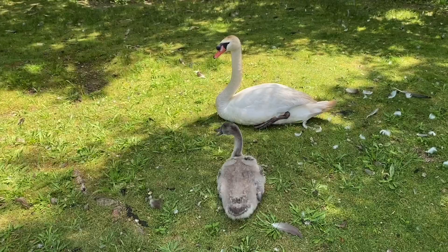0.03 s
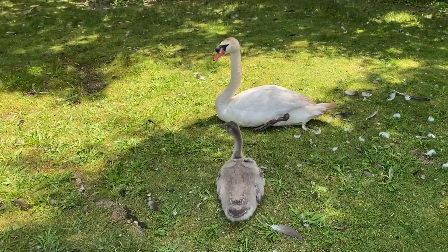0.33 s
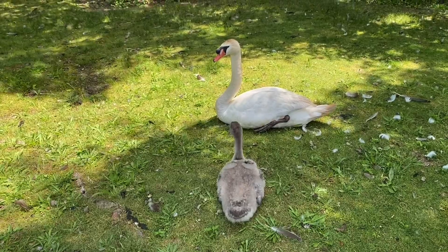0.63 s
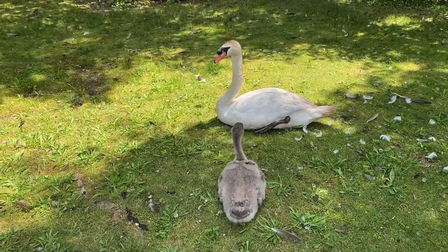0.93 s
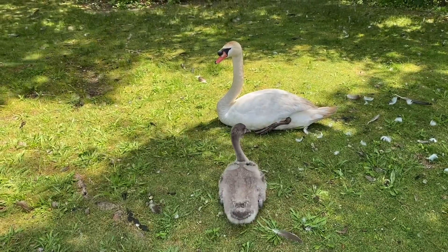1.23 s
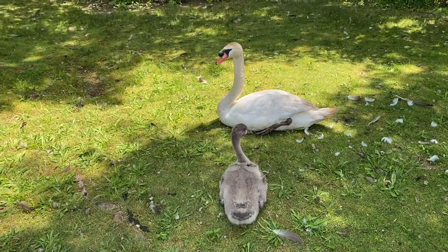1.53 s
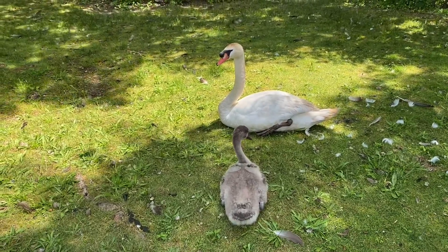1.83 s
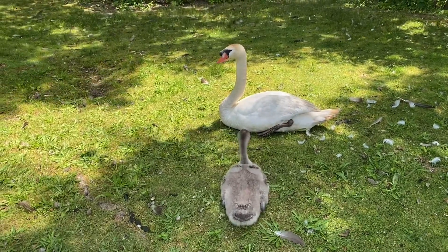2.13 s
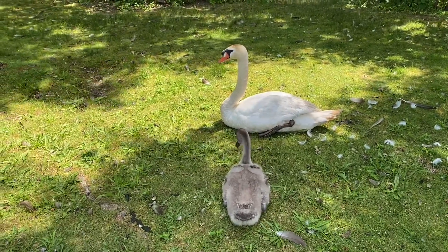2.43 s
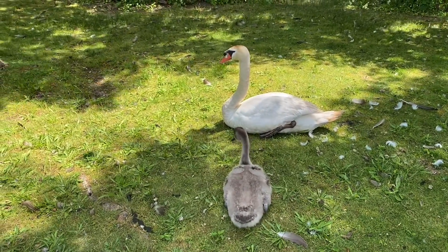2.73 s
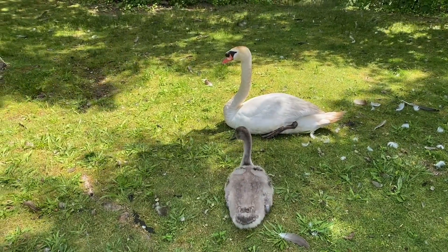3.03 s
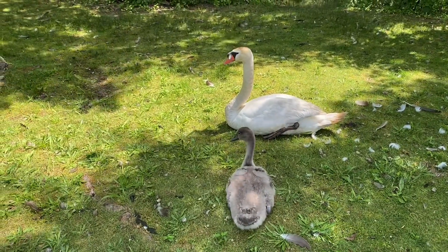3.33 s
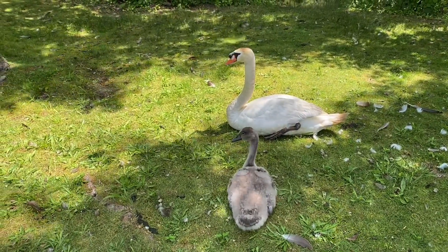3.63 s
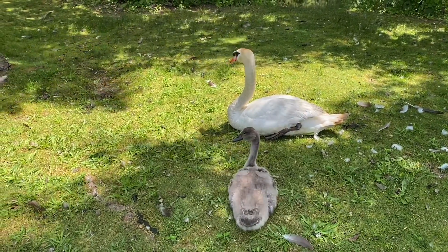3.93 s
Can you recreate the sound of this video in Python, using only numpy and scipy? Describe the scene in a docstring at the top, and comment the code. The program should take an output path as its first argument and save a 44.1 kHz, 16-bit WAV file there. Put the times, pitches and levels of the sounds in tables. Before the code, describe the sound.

A young swan peeps thinly outdoors while wind rumbles on the microphone.

```python
"""Gusts rumble on the microphone, and out on the lawn a cygnet peeps six times: thin arched whistles
that beat against their own near echoes, some trailed by a soft husky puff. The bird faces away, so much
of its treble arrives scattered. Small birds call far off and the grass rustles over a steady outdoor
hiss, a fading distant wash and a faint electrical whine."""
import sys
import numpy as np
from scipy import signal
from scipy.fft import rfft, irfft
from scipy.io import wavfile
from scipy.ndimage import uniform_filter1d

SR = 44100
rng = np.random.default_rng(int(sys.argv[2]) if len(sys.argv) > 2 else 0)


def transcribe(u):
    """Save the signal u as a 16-bit wav file named by the first command-line argument.

    u: samples, shape (n,) or (channels, n), limited to [-1, 1]; the rate is SR.
    q: integer samples, one column per channel.
    """
    v = np.clip(np.atleast_2d(u).T, -1, 1)
    q = np.round(v * 32767).astype(np.int16)
    wavfile.write(sys.argv[1], SR, q)


N = 176400
TIME = np.arange(N) / SR


def peep(course, jitter, second_db, third_db, bloom_at):
    """One whistle, rougher until the voice settles; overtones peak at the share bloom_at of its length."""
    edge_s, voice_db, shimmer_db = 0.002, -1.5, 2
    opening_roughness, settle_s = 1.7, 0.063
    times, hz, db = np.transpose(course)
    start = times[0]
    length = times[-1] - start + edge_s
    t = np.arange(0, length, 1 / SR)
    roughness = jitter * (1 + opening_roughness * np.exp(-t / settle_s))
    pitch = np.interp(start + t, times, hz) * (1 + roughness * wander(rate_hz=190)[:len(t)])
    phase = 2 * np.pi * np.cumsum(pitch) / SR
    gate = np.minimum(np.minimum(t, length - t) / edge_s, 1)
    envelope = np.sqrt(2) * gate * amp(shimmer_db * wander(rate_hz=120)[:len(t)])
    tone = np.sin(phase) * amp(voice_db + np.interp(start + t, times, db))
    bloom = np.exp(-((t / length - bloom_at) / 0.35) ** 2)
    overtones = bloom * (amp(second_db) * np.sin(2 * phase) + amp(third_db) * np.sin(3 * phase))
    return start, envelope * tone, envelope * overtones


def cygnet():
    """Six peeps on the lawn that scoop up, hold and drop; the last only rises. Returns tones, treble."""
    # each peep's course (time [s], pitch [Hz], relative level [dB])
    first = [(0.575, 2090, -77.5), (0.6, 2180, -72), (0.617, 2225, -65), (0.64, 2480, -76),
             (0.662, 2390, -67), (0.685, 2350, -62), (0.73, 2450, -71), (0.788, 2470, -70.3),
             (0.812, 2130, -79)]
    second = [(0.932, 2160, -72.1), (0.939, 2320, -60), (0.95, 2490, -74.8), (0.97, 2730, -68.5),
              (1.0, 2670, -62.7), (1.05, 2640, -65), (1.092, 2590, -68.8), (1.104, 2440, -75),
              (1.113, 2166, -63), (1.119, 2030, -72)]
    third = [(1.257, 2190, -78.9), (1.264, 2320, -67), (1.274, 2530, -76), (1.292, 2670, -70),
             (1.318, 2670, -69), (1.335, 2615, -63.0), (1.375, 2628, -58.5), (1.405, 2566, -70),
             (1.424, 2480, -75), (1.438, 2200, -65.3), (1.447, 2050, -72.4)]
    fourth = [(1.652, 2380, -73), (1.675, 2690, -72), (1.71, 2653, -66), (1.735, 2633, -61.5),
              (1.772, 2633, -59.9), (1.797, 2580, -70), (1.817, 2390, -74), (1.831, 2136, -59),
              (1.839, 2030, -69)]
    fifth = [(2.214, 2144, -72), (2.224, 2380, -61), (2.24, 2590, -64.1), (2.265, 2783, -59),
             (2.287, 2703, -60), (2.302, 2655, -72), (2.32, 2730, -53), (2.348, 2750, -55.5),
             (2.39, 2653, -59), (2.414, 2470, -61), (2.437, 2076, -77)]
    sixth = [(3.945, 1770, -71), (3.955, 1960, -63.6), (3.975, 2170, -56.5), (3.993, 2370, -56.3)]
    tones, treble = np.zeros((2, N))
    for start, tone, overtones in (
        peep(first, jitter=0.0143, second_db=-76.5, third_db=-83, bloom_at=0.6),
        peep(second, jitter=0.0072, second_db=-76, third_db=-76, bloom_at=0.62),
        peep(third, jitter=0.0052, second_db=-78, third_db=-77, bloom_at=0.42),
        peep(fourth, jitter=0.0052, second_db=-75, third_db=-77, bloom_at=0.57),
        peep(fifth, jitter=0.0044, second_db=-65.5, third_db=-74, bloom_at=0.52),
        peep(sixth, jitter=0.0038, second_db=-87, third_db=-83, bloom_at=0.8),
    ):
        add(tones, start, tone)
        add(treble, start, overtones)
    return tones, treble


def puffs():
    """Soft husky puffs of noise that trail the first four peeps."""
    # (start [s], length [s], level [dB])
    trailing_puffs = [(.81, .14, -67), (1.104, 0.068, -64.5), (1.433, 0.057, -64), (1.83, .06, -65)]
    out = np.zeros(N)
    for start, length, db in trailing_puffs:
        add(out, start, amp(db) * swell(band(hz=880, octaves=0.44), length))
    return out


def lawn(sound, scatter_db):
    """The way to the microphone: the direct path, two near echoes and a thin scatter from the trees."""
    # near echoes (delay [s], level [dB])
    echoes = [(.008, -15), (.0205, -11)]
    direct_s, t60_s, build_s = 0.0017, 0.59, 0.02
    t = TIME[:SR // 2]
    scatter = rng.standard_normal(len(t)) * amp(-60 * t / t60_s) * np.minimum(t / build_s, 1)
    response = scatter * amp(scatter_db) / np.linalg.norm(scatter)
    for delay, db in [(direct_s, 0)] + echoes:
        add(response, delay, amp([db]))
    return signal.fftconvolve(sound, response)[:N]


def wind():
    """Gusts buffet the microphone: a deep rumble, with flutter above it in the stronger ones."""
    # gusts, in three stretches (time [s], relative rumble level [dB], relative flutter level [dB])
    gusts = [
        [(0.0, -57, -54), (0.022, -43, -55), (0.106, -46, -64.5), (0.148, -65, -69), (0.186, -47.5, -80),
         (0.262, -55, -59), (0.49, -49, -66.5), (0.546, -46, -54), (0.566, -58, -71), (0.686, -40.5, -55.5),
         (1.024, -60, -78), (1.094, -43, -53), (1.168, -62, -70), (1.182, -52.5, -76), (1.262, -45.5, -55.5),
         (1.416, -58.5, -74), (1.524, -46, -58.5), (1.68, -60, -72)],
        [(1.68, -61, -69), (1.724, -43, -60.5), (1.762, -39.5, -51.5), (1.812, -40.5, -52.5), (1.822, -53, -72),
         (1.878, -29, -41.5), (1.926, -39.5, -53), (1.972, -34.5, -40), (2.014, -49, -58), (2.134, -57, -65),
         (2.164, -43, -56), (2.31, -44, -54.5), (2.326, -41, -41), (2.406, -35, -41), (2.424, -45, -53.5),
         (2.546, -35.5, -42), (2.588, -44.5, -64.5), (2.7, -52, -57)],
        [(2.7, -48, -64), (2.746, -43.5, -51), (2.764, -50, -71), (2.782, -57, -56), (2.876, -43, -61),
         (2.902, -43, -51.5), (3.108, -33, -43), (3.308, -43, -53), (3.518, -35, -55), (3.564, -54, -69),
         (3.6, -42.5, -58), (3.63, -51, -79), (3.724, -44, -70), (3.814, -54.5, -81), (3.844, -44, -66),
         (3.88, -42.5, -66), (3.908, -61.5, -62), (4.0, -57, -60.5)],
    ]
    # spectra of the turbulence (frequency [Hz], relative density [dB])
    rumble_spectrum = [(10, -12), (28, 1), (45, 2), (75, -0.5), (120, -7), (170, -14.5), (260, -26.5),
                       (500, -61), (2000, -98)]
    flutter_spectrum = [(40, -30.5), (110, -6), (155, -3.5), (200, -6), (310, -14.5), (480, -23),
                        (700, -32.5), (1200, -48.5), (3000, -66)]
    times, rumble_db, flutter_db = np.vstack(gusts).T
    rumble = eddies(rumble_spectrum, steady_s=0.07) * amp(np.interp(TIME, times, rumble_db) - 0.5)
    flutter = eddies(flutter_spectrum, steady_s=0.063) * amp(np.interp(TIME, times, flutter_db) + 1.5)
    return rumble + flutter


def eddies(spectrum, steady_s):
    """Turbulent noise whose strength is even over times longer than steady_s."""
    turbulence = noise(spectrum)
    local_power = uniform_filter1d(turbulence ** 2, int(steady_s * SR))
    return turbulence / np.sqrt(abs(local_power) + 1e-6)


def faint_whistles():
    """The cygnet's low second voice, a brief squeak, distant birds' notes and a far buzzy trill."""
    # plain glides (start [s], length [s], level [dB], first pitch [Hz], last pitch [Hz])
    whistles = [(.318, 0.045, -77, 2640, 2489), (1.074, 0.014, -69, 3240, 3060),
                (2.337, 0.16, -74, 1590, 1630), (3.745, 0.07, -81, 3350, 3310)]
    trill_start_s, trill_length_s, trill_db, buzz_hz = 2.53, 0.43, -73, 36
    out = np.zeros(N)
    for start, length, db, first_hz, last_hz in whistles:
        phase = 2 * np.pi * np.cumsum(np.linspace(first_hz, last_hz, int(length * SR))) / SR
        add(out, start, amp(db) * swell(np.sqrt(2) * np.sin(phase), length))
    trill = band(hz=2820, octaves=0.11) * (1 + 0.25 * np.sin(2 * np.pi * buzz_hz * TIME))
    add(out, trill_start_s, amp(trill_db) * swell(trill, trill_length_s))
    return out


def grass():
    """The grass stirs in short grainy rustles, high in the treble."""
    # (start [s], length [s], level [dB], band centre [Hz])
    rustles = [(0.217, .02, -74, 13000), (3.207, .08, -71.5, 8950), (3.252, .04, -69, 13500),
               (3.316, .014, -73, 11000), (3.923, .025, -75, 11980)]
    out = np.zeros(N)
    for start, length, db, hz in rustles:
        grains = unit(band(hz, octaves=0.25) * amp(3.2 * wander(rate_hz=200)))
        add(out, start, amp(db) * swell(grains, length))
    return out


def background():
    """Steady open-air hiss, a distant wash that dies away and a faint electrical whine."""
    # outdoor hiss (frequency [Hz], relative density [dB])
    air_spectrum = [(30, -1), (300, 3.5), (600, -1), (900, -3), (1300, -7.5), (2000, -12), (3200, -14.5),
                    (4200, -15.5), (5500, -13.5), (8500, -14.5), (10500, -17), (12500, -17), (15700, -20.5)]
    hiss_db, wash_db, fade_db_per_s = -62.5, -74, 3.5
    whine_hz, whine_db = 10239, -90.5
    hiss = noise(air_spectrum) * amp(hiss_db + 0.22 * wander(rate_hz=13))
    wash = band(hz=1090, octaves=0.4) * amp(wash_db - fade_db_per_s * TIME)
    whine = amp(whine_db) * np.sqrt(2) * np.sin(2 * np.pi * whine_hz * TIME)
    return hiss + wash + whine


def amp(db):
    """Decibels to gain."""
    return 10 ** (np.asarray(db) / 20)


def unit(x):
    """Scales to rms 1."""
    return x / np.sqrt(np.mean(x ** 2) + 1e-20)


def add(mix, start_s, sound):
    """Mixes a sound in at a time."""
    part = mix[max(round(start_s * SR), 0):][:len(sound)]
    part += sound[:len(part)]


def shaped_noise(gain_at):
    """Noise of rms 1, coloured by a gain that is a function of frequency in Hz."""
    gain = gain_at(np.fft.rfftfreq(N, 1 / SR))
    return unit(irfft(rfft(rng.standard_normal(N)) * gain, N))


def noise(spectrum):
    """Noise that follows the points (frequency [Hz], relative density [dB])."""
    hz, db = np.transpose(spectrum)
    return shaped_noise(lambda f: amp(np.interp(np.log(f + 1), np.log(hz), db)))


def band(hz, octaves):
    """Noise in a bell-shaped band."""
    return shaped_noise(lambda f: np.exp(-0.5 * (np.log2((f + 1) / hz) / octaves) ** 2))


def wander(rate_hz):
    """Random motion, mostly slower than rate_hz."""
    return shaped_noise(lambda f: np.exp(-0.5 * (f / rate_hz) ** 2))


def swell(sound, length_s):
    """Cuts a piece that fades in and out along one arch."""
    count = int(length_s * SR)
    return sound[:count] * np.sqrt(np.sin(np.pi * np.arange(count) / count))


def scene():
    """Everything at the one microphone on the lawn."""
    tones, treble = cygnet()
    birds = lawn(tones + puffs() + faint_whistles(), scatter_db=-10)
    birds += lawn(treble, scatter_db=-6)  # the cygnet faces away, so more of its treble is scattered
    return (birds + grass() + wind() + background())[None]


def record(dry):
    """The recorder's band limit: a steep low-pass."""
    edge_hz = 15740
    low_pass = signal.firwin(801, edge_hz, window=("kaiser", 9), fs=SR)
    return signal.oaconvolve(dry, low_pass[None], "same")


dry = scene()
out = record(dry)
transcribe(out)
```